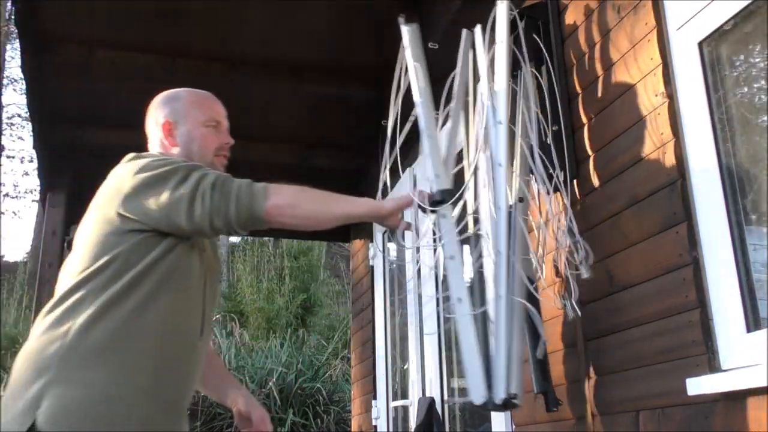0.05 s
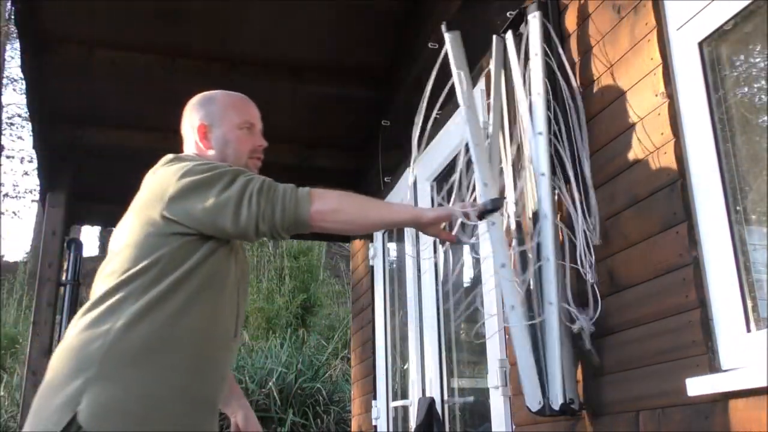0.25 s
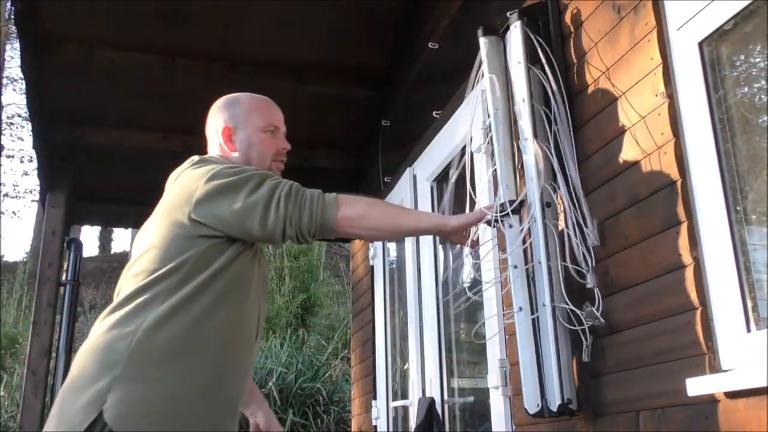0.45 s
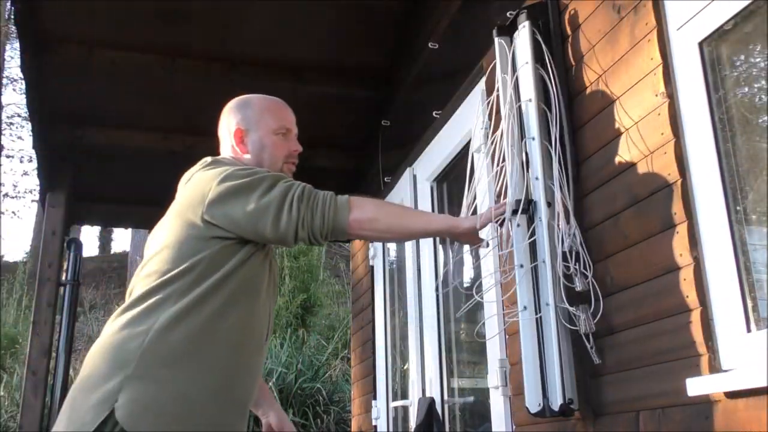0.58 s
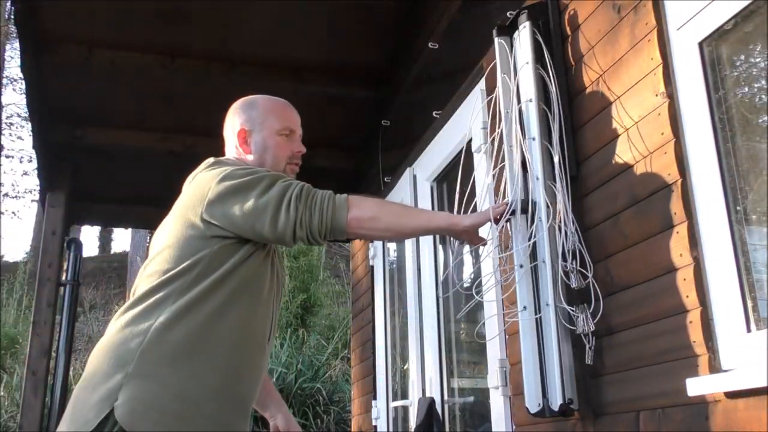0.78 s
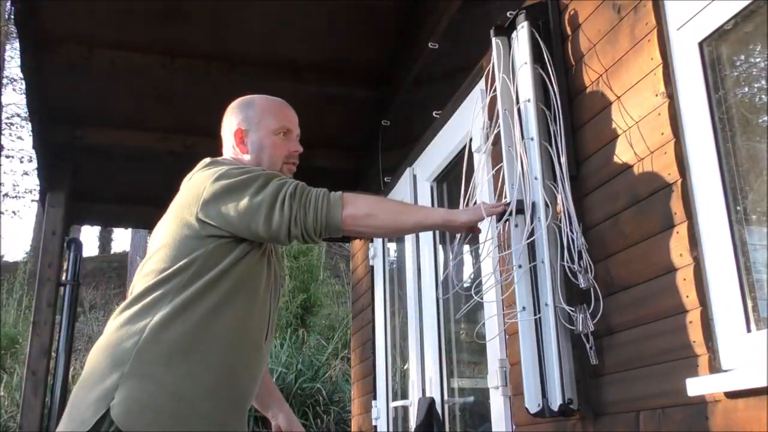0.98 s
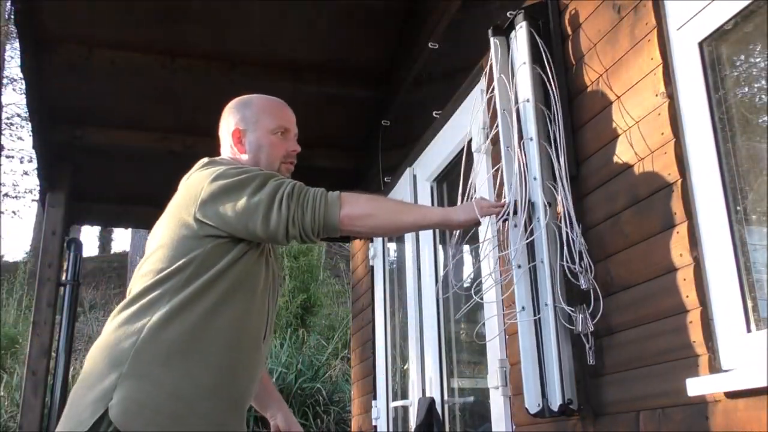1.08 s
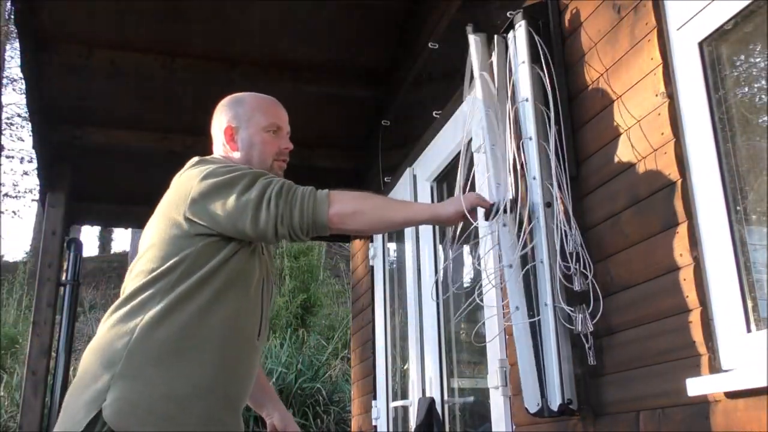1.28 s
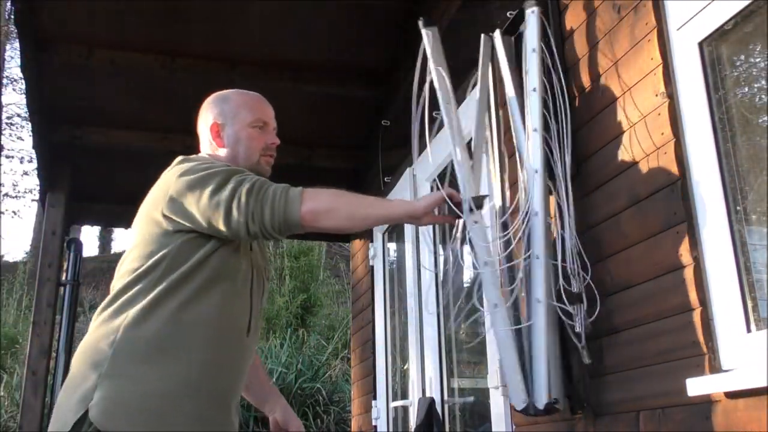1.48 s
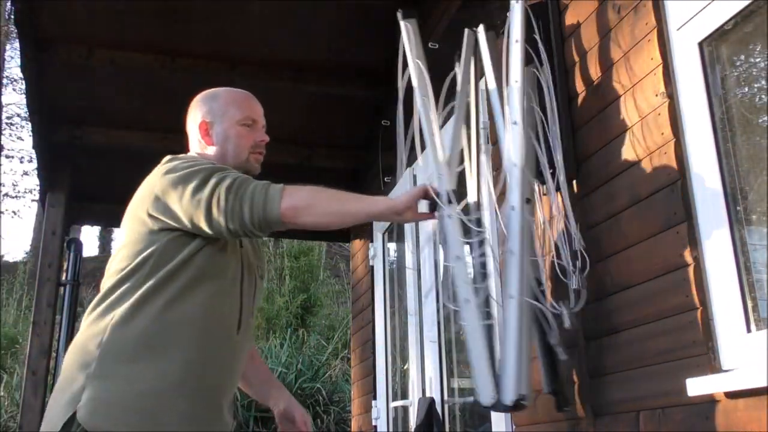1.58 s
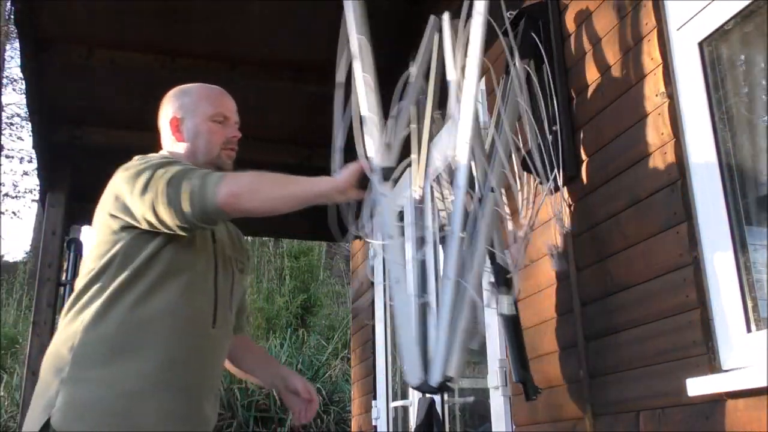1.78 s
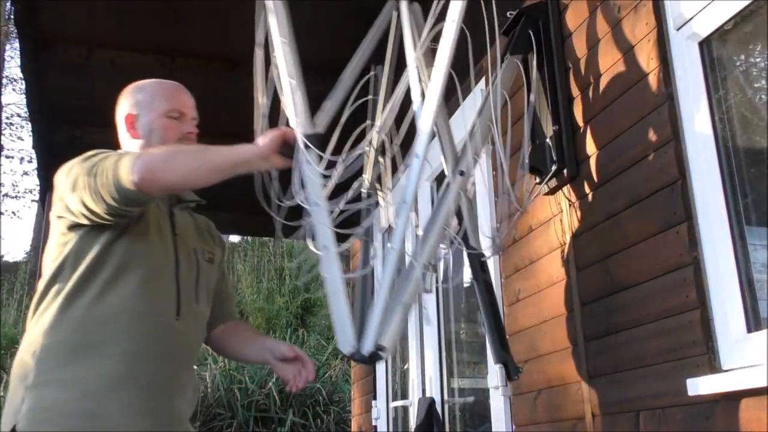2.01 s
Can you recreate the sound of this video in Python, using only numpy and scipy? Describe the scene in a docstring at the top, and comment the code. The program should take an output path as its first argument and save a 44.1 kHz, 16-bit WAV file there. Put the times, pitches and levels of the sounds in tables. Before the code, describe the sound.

Clacking and scraping from a folding clothes drier being pushed closed and pulled back open.

```python
"""Folding clothes drier on a porch

A wall-mounted drier is pushed shut, rests, and is pulled open again. Its slider scrapes along
the mast, plastic joints knock, and the aluminium arms clack together and thump the timber wall.
The wooden porch roof gives a short echo over a quiet garden."""
import sys
import numpy as np
from scipy import signal
from scipy.fft import rfft, irfft, next_fast_len
from scipy.io import wavfile
from scipy.ndimage import uniform_filter1d, map_coordinates

SR = 44100
rng = np.random.default_rng(int(sys.argv[2]) if len(sys.argv) > 2 else 0)


def wrap_up_sound(samples):
    """Save the sound to the file named by the first command line argument, as 16-bit audio."""
    columns = np.atleast_2d(samples).T
    # keep every value between -1 and 1, then stretch to whole-number steps
    tamed = np.clip(columns, -1, 1)
    steps = np.round(tamed * 32767).astype(np.int16)
    wavfile.write(sys.argv[1], SR, steps)


N = 90404
RING_TIME = np.arange(SR // 3) / SR  # seconds since a hit
LONGEST_FADE_S = .26  # cap on fade_s in the note tables; a fade is a drop of 60 dB

# Tone colours, or how strong each pitch is: pitch_hz, level_db
GARDEN_COLOUR = [(20, -22), (45, 3), (70, 3.5), (110, -5.5), (200, -7), (450, -17), (780, -7), (1200, -15),
                 (2000, -27), (4000, -31), (8000, -36), (15000, -40.5)]
SCRAPE_COLOUR = [(500, -44), (2500, 5), (4200, 0.5), (6200, 1), (7300, -2.5), (9200, 2.5), (11000, -7),
                 (12500, 4.5), (13500, 3.5), (15500, -8.5)]
RUB_COLOUR = [(90, 1), (250, 2), (420, -3), (700, -2), (1050, -0.5), (1700, -7), (2500, -3.5),
              (3700, -18.5), (7000, -21), (12000, -35.5)]
KNOCK_COLOUR = [(80, -19), (280, -0.5), (600, -3.5), (950, 1), (1450, -4.5), (2100, -8), (3200, -17),
                (7000, -24.5), (15000, -47)]
CLACK_COLOUR = [(100, -5), (250, 5.5), (600, -3.5), (950, -2), (1500, -4), (2300, 4), (3300, -2.5),
                (5000, -8.5), (7600, -5.5), (10000, -13.5), (15000, -17.5)]
# Stereo width (mid is what both ears share, side is how they differ): pitch_hz, side_db
GARDEN_WIDTH = [(40, -12.5), (200, -3.5), (700, -5.5), (2500, -2), (10000, 0.5)]
DRIER_WIDTH = [(40, -20), (200, -16), (600, -13), (1400, -13.5), (2800, -8), (5600, -4.5), (10000, -2.5),
               (15000, 0.5)]
# Echoes off the wall and door behind the drier: delay_s, level_db
WALL_ECHOES = [(.00185, -15.5), (.0031, -14.5), (.0052, -16)]
# Pitches that rubbing brings out: pitch_hz, half_width_hz, level_db
MAST_PEAKS = [(6320, 170, -10), (7830, 79, -5.5), (8690, 140, -2), (9420, 103, -3.5), (10600, 140, -7.5),
              (11900, 130, -5.5), (12200, 100, -16), (13470, 85, -1), (14440, 95, 2.5)]
ARM_PEAKS = [(912, 71, -1), (1660, 27, 6), (1792, 57, 2), (2274, 48, 2.5)]
PIVOT_PEAKS = [(366, 32, 1.5), (423, 37, 6), (520, 62, -4.5)]
# The slider moving along the mast: time_s, scrape_db, rub_db
SLIDE_LEVELS = [(0, -53, -45.5), (.03, -42.5, -51.5), (.09, -49.5, -48), (.15, -53.5, -52),
                (0.191, -34.5, -37.5), (.26, -41.5, -41), (.36, -38.5, -33), (.43, -43.5, -38.5),
                (.48, -44, -48), (.55, -43.5, -45.5), (.66, -42.5, -31.5), (.76, -69, -46.5),
                (.9, -79, -63), (1.12, -97, -56.5), (1.17, -69, -45.5), (1.24, -80, -56.5),
                (1.41, -77, -48.5), (1.45, -70, -40.5), (1.53, -59, -42.5), (1.60, -48.5, -47),
                (1.69, -43.5, -44), (1.80, -43, -42), (1.87, -40.5, -46.5), (1.905, -43.5, -48),
                (1.945, -50.5, -44), (1.965, -39.5, -37.5), (2.05, -49, -41.5)]
# The pivots chafing, loudest as the arms spread: time_s, level_db
GROAN_LEVELS = [(1.86, -54), (1.92, -43), (1.99, -43), (2.05, -38.5)]
# Notes that each part rings with when hit: pitch_hz, level_db, fade_s
BOARD_NOTES = [(168.7, 1, 0.24), (203, -8, 0.45), (225.9, -0.5, 0.31), (247.5, 1.5, 0.25),
               (292.6, -10, 0.1), (347.6, -6, 0.22), (377, -8, 0.13)]  # wall boards
BOOM_NOTES = [(31, -10, 0.61), (47.7, -4, 0.32), (68.5, 2.5, 0.18), (85.4, -2, 0.198)]  # timber behind the boards
HOUSING_NOTES = [(340.3, -3, 0.19), (796, -5, 0.061), (1047, -10, 0.072), (1206, -0.5, 0.05),
                 (1407, 3.5, 0.066), (1503, -4, 0.07), (2056, -4, 0.17)]  # hollow joint housings
SLAM_NOTES = [(160, 1.5, 0.071), (245, -3, 0.12), (353, 2.5, .12), (678, -7, 0.14), (839, -1, 0.16),
              (1070, -14, 0.11)]  # arms slapping shut
CATCH_NOTES = [(2980, -19, 0.18), (4183, -6, 0.057), (6413, -6, .12), (7074, -13, 0.05), (7617, -10, 0.032)]  # steel catch
TUBE_NOTES = [(840, 1, 0.23), (1024, -15, 0.28), (1970, -3, .3), (2140, 14, 0.17), (2760, -2, 0.14),
              (2910, 7, 0.18), (3050, 8, 0.18), (3500, 1, .15), (4540, -12, 0.16), (5010, 3, 0.34),
              (6600, 19, 0.087), (7040, -12, 0.093), (7650, 6, 0.11)]  # aluminium tubes
# How long the drier's whole frame rings: pitch_hz, fade_s
FRAME_FADES = [(150, .15), (700, .12), (2300, 0.12), (4000, .14), (7000, 0.11), (15000, 0.067)]
# Shocks passing into the wall: start_s, boards_db, boom_db
WALL_THUMPS = [(0.284, -17, -40), (0.2916, -27, -21.5), (0.3400, -25.5, -26), (0.4880, -50, -43),
               (0.5136, -34, -45), (0.5780, -24.5, -37), (0.587, -25.5, -32), (0.6300, -32.5, -27.5),
               (0.6760, -29.5, -48), (0.801, -67, -46), (0.8650, -42.5, -52), (1.6990, -27, -40),
               (1.7120, -29, -29), (1.7530, -28, -27), (1.834, -40, -33)]
# Loose plastic joints knocking: start_s, level_db, bass_db, treble_db, ring_db
JOINT_KNOCKS = [(0.1145, -36, -10.5, 2.5, -4.5), (0.1820, -36, -3, 4, -1), (0.238, -22, -5.5, 0, -28),
                (0.2543, -26, -11, 1, -6), (0.2656, -31, -7, 1, -9), (0.2807, -25.5, 4, 2, -18),
                (0.2836, -14, -1.5, 0.5, -13), (0.4210, -33, 6, 7, -1), (0.5721, -23.5, 6, 5, -22),
                (0.5790, -25.5, 8, 10, -12), (1.1977, -38, 6, -9, -9), (1.2677, -39.5, 5.5, -1, -14),
                (1.3512, -30, -3.5, -6, 0), (1.6974, -34, 10, -5, 2.5), (1.7086, -26, 5.5, -2, -10)]
# Arm hitting arm: start_s, level_db, bass_db, bite_db (near 6 kHz), treble_db, ring_db
ARM_CLACKS = [(0.1900, -31, -6, -3, 20, -12), (0.2078, -22.5, -18, -0.5, -26, -22),
              (0.2838, -21.5, 2, -6, -4, -20), (0.2912, -17, -0.5, 4.5, 7, -5),
              (0.2990, -22.5, 0, 10, 0, -25), (0.3110, -23.5, -5, 2, -1, -12),
              (0.3212, -18.5, -12, 1.5, 5, -18), (0.3315, -24, -12, 1, 6.5, -14),
              (0.3440, -32, 1, 1, 6, -9), (0.3570, -29, 13, -1, -4, -17), (0.4382, -22.5, -11, 7, 2, -15),
              (0.5095, -28, -16, 5, -1, -9), (0.5142, -21, -10.5, 2.5, 1.5, -4),
              (0.5848, -14.5, 4, 4.5, 4.5, -8), (0.5878, -19, -1, -2, -4, -10),
              (0.6025, -22, -21, 5, 2, -18), (0.6120, -25, -13, 3, 2, -18),
              (0.6220, -22.5, 8, 1.5, -2, -10), (0.6734, -24.5, 0, -2.5, -10.5, -21),
              (0.6774, -26.5, 7.5, -14, -16, -18), (0.6920, -40, 10, -12, -16, -16),
              (0.7340, -43, 5, -18, -16, -18), (0.8111, -44, -3, -1, 2, -27),
              (0.8315, -37, 1, -2, -1.5, -9), (0.8959, -47, -11, -2.5, -18, -12),
              (0.9612, -47, -3, -2.5, -14, -12), (1.0296, -45.5, 4.5, -3, -7, -14),
              (1.1917, -42, 7, -2, -4, -15), (1.4460, -41.5, -7, -2, -16, -9),
              (1.5010, -44, -9, -3, 2, -14), (1.5648, -41.5, -6, -6, -1, -20),
              (1.6427, -41, -11, -5, -9, -17), (1.7405, -24, 3.5, 1, 5, -16),
              (1.7470, -32, 5.5, -13, 0, -14), (1.7560, -32.5, 1, 3, 6, -21),
              (1.8332, -33, -2, 3.5, 3, -15)]


def gain(db):
    """Turn decibels into a number to multiply by."""
    return 10 ** (np.asarray(db) / 20)


def unit(x):
    """Scale x to an average power of 1."""
    return x / np.sqrt(np.mean(x ** 2))


def curve(points):
    """Join (pitch, value) points into a curve that can be read at any pitch."""
    pitches, values = np.array(points).T
    return lambda hz: np.interp(np.log(np.maximum(hz, 1)), np.log(pitches), values)


def peaks(rows):
    """A curve in dB with a bump at each ringing pitch."""
    def db_at(f):
        power = sum(gain(db) ** 2 / (1 + ((f - hz) / width) ** 2) ** 2 for hz, width, db in rows)
        return 10 * np.log10(power + 1e-9)
    return db_at


def colour(x, db_at):
    """Give x the tone colour of a dB curve; white noise keeps its power."""
    n = 2 * next_fast_len(x.shape[-1] // 2 + SR // 40)
    response = unit(gain(db_at(np.arange(n // 2 + 1) * SR / n)))
    # Fold the filter so that it rings only after a hit, never before.
    cepstrum = irfft(np.log(response))
    cepstrum[1:n // 2] *= 2
    cepstrum[n // 2 + 1:] = 0
    return irfft(rfft(x, n) * np.exp(rfft(cepstrum)))[..., :x.shape[-1]]


def add(out, start_s, x):
    """Mix x into out at the given time."""
    i = int(start_s * SR)
    out[:, i:i + x.shape[1]] += x[:, :N - i]


def spread(x, width):
    """Turn mid and side into left and right, with a width for each pitch."""
    n = next_fast_len(N, True)
    hz = np.arange(n // 2 + 1) * SR / n
    side = irfft(rfft(x[1], n) * gain(curve(width)(hz)), n)[:N]
    return np.array([x[0] + side, x[0] - side])


def garden(level_db=-46.5):
    """A faint outdoor rumble and a distant hush."""
    return gain(level_db) * colour(rng.standard_normal((2, N)), curve(GARDEN_COLOUR))


def porch(x, level_db=-9.5, low_fade_s=.32, high_fade_s=.13, split_hz=3800, delay_s=.008):
    """The roof and walls give a short echo whose treble dies first."""
    def band(kind):
        noise = rng.standard_normal((2, len(RING_TIME)))
        return signal.sosfilt(signal.butter(2, split_hz, kind, fs=SR, output="sos"), noise)
    low_fade, high_fade = (gain(-60 * RING_TIME / s) * (RING_TIME > delay_s)
                           for s in (low_fade_s, high_fade_s))
    echo = (band("low") * low_fade + band("high") * high_fade) / np.sqrt(np.sum(low_fade ** 2))
    return gain(level_db) * signal.fftconvolve(x[:1], echo, axes=1)[:, :N]


def with_wall_echoes(x):
    """The wall right behind throws the clatter back within a few milliseconds."""
    echoes = sum(gain(db) * np.pad(x, ((0, 0), (int(s * SR), 0)))[:, :N] for s, db in WALL_ECHOES)
    return (x + echoes) / np.sqrt(1 + sum(gain(db) ** 2 for _, db in WALL_ECHOES))


def friction(ticks_per_s, db_at):
    """Surfaces stick and slip, making a stream of tiny, uneven ticks."""
    ticks = (rng.random(N) < ticks_per_s / SR) * rng.standard_normal((2, N))
    return colour(unit(ticks), db_at)


def wobble(steps_per_s=22):
    """A smooth random wander, roughly between -1 and 1."""
    hold = int(SR / steps_per_s)
    steps = np.repeat(rng.standard_normal(N // hold + 1), hold)
    return 1.3 * uniform_filter1d(uniform_filter1d(steps, hold), hold)[:N]


def squeal(ticks_per_s, spots=3, pitch_drift=.022, flutter_db=.5):
    """The slider rings the mast at a few spots, each wavering in pitch and strength."""
    out = 0
    for _ in range(spots):
        position = np.cumsum(1 + pitch_drift * wobble()) % (N - 1)  # uneven speed bends the pitch
        tone = friction(ticks_per_s, peaks(MAST_PEAKS))
        bent = np.array([map_coordinates(channel, [position], order=3) for channel in tone])
        out = out + bent * gain(flutter_db * wobble())
    return unit(out)


def slider(scrape_ticks_per_s=9000, rub_ticks_per_s=4000):
    """The slider scrapes and rubs along the mast; the pivots groan as the arms spread."""
    t = np.arange(N) / SR
    times, scrape_db, rub_db = np.array(SLIDE_LEVELS).T
    scrape = friction(scrape_ticks_per_s, curve(SCRAPE_COLOUR))
    scrape += gain(2) * squeal(scrape_ticks_per_s)
    rub = friction(rub_ticks_per_s, curve(RUB_COLOUR))
    rub += gain(-12) * friction(rub_ticks_per_s, peaks(ARM_PEAKS))
    groan = friction(rub_ticks_per_s, peaks(PIVOT_PEAKS))
    return (unit(scrape) * gain(np.interp(t, times, scrape_db))
            + unit(rub) * gain(np.interp(t, times, rub_db))
            + groan * gain(np.interp(t, *np.array(GROAN_LEVELS).T)))


def ring(notes, scatter=True):
    """A struck part rings with a few fading notes; without scatter they start in step in the mid."""
    hz, db, fade_s = np.array(notes).T[:, :, None]
    phase = 2 * np.pi * rng.random((2, len(hz), 1))
    phase[0] *= scatter
    levels = gain(db - 60 * RING_TIME / np.minimum(fade_s, LONGEST_FADE_S))
    waves = levels * np.sin(2 * np.pi * hz * RING_TIME + phase)
    return waves.sum(1) / np.sqrt(np.sum(gain(db) ** 2) / 2)


def wall(rise_s=.0015):
    """Heavy shocks pass through the bracket and drum on the timber wall."""
    out = np.zeros((2, N))
    rise = 1 - np.exp(-RING_TIME / rise_s)
    for start_s, boards_db, boom_db in WALL_THUMPS:
        boards = gain(boards_db) * ring(BOARD_NOTES)
        boom = gain(boom_db) * ring(BOOM_NOTES, scatter=False)
        add(out, start_s, rise * (boards + boom))
    return out


def frame_rings(hits, notes=520):
    """The frame has many close notes; each hit lands somewhere new and mixes them afresh."""
    hz = np.linspace(10, 126, notes) ** 2 * (1 + .004 * rng.standard_normal(notes))
    fades = gain(-60 * RING_TIME / curve(FRAME_FADES)(hz)[:, None])
    waves = fades * np.sin(2 * np.pi * (hz[:, None] * RING_TIME + rng.random((notes, 1))))
    weights = rng.choice([-1, 1], (2 * hits, notes)) * unit(hz ** .25) * np.sqrt(2 / notes)
    return (weights @ waves).reshape(hits, 2, -1)


def hit(frame, tone, bass_db, bite_db, treble_db, crack_db, crack_s=.0058):
    """A brief crack plus the frame's ring, coloured by how heavy and hard the contact is."""
    crack = gain(crack_db) * np.exp(-RING_TIME / crack_s) * rng.standard_normal(frame.shape)
    tilt = [(450, bass_db), (1700, 0), (2500, 0), (4500, bite_db), (7500, bite_db), (12000, treble_db)]
    return colour(frame + crack, lambda hz: curve(tone)(hz) + curve(tilt)(hz))


def joints(damping_per_s=19, rise_s=.00082, slam_s=.5815, slam_db=-15.5):
    """Hollow plastic joints give dull, short knocks, and the arms slap shut once."""
    out = np.zeros((2, N))
    rise = 1 - np.exp(-RING_TIME / rise_s)  # plastic gives a little before it bites
    damping = np.exp(-damping_per_s * RING_TIME)
    for row, frame in zip(JOINT_KNOCKS, frame_rings(len(JOINT_KNOCKS))):
        start_s, level_db, bass_db, treble_db, ring_db = row
        knock = hit(frame * damping, KNOCK_COLOUR, bass_db, treble_db, treble_db, crack_db=-2.5)
        add(out, start_s, gain(level_db) * rise * (knock + gain(ring_db) * ring(HOUSING_NOTES)))
    add(out, slam_s, gain(slam_db) * ring(SLAM_NOTES))
    return out


def arms(catch_s=.4385, catch_db=-20):
    """The aluminium tubes clack together and bounce; the steel catch pings as they close."""
    out = np.zeros((2, N))
    for row, frame in zip(ARM_CLACKS, frame_rings(len(ARM_CLACKS))):
        start_s, level_db, bass_db, bite_db, treble_db, ring_db = row
        clack = hit(frame, CLACK_COLOUR, bass_db, bite_db, treble_db, crack_db=-5)
        add(out, start_s, gain(level_db) * (clack + gain(ring_db) * ring(TUBE_NOTES)))
    add(out, catch_s, gain(catch_db) * ring(CATCH_NOTES))
    return out


def scene(lean_right_db=.7):
    """The drier under its porch, with centred bass and wide treble, in front of the garden."""
    drier = with_wall_echoes(arms() + slider()) + joints() + wall()
    stereo = spread(drier + porch(drier), DRIER_WIDTH) + spread(garden(), GARDEN_WIDTH)
    return stereo * gain([[-lean_right_db / 2], [lean_right_db / 2]])


def record(dry):
    """Cut away the very highest treble."""
    top_hz = 15600
    return signal.sosfilt(signal.ellip(8, .2, 70, top_hz, fs=SR, output="sos"), dry)


dry = scene()
out = record(dry)
wrap_up_sound(out)
```